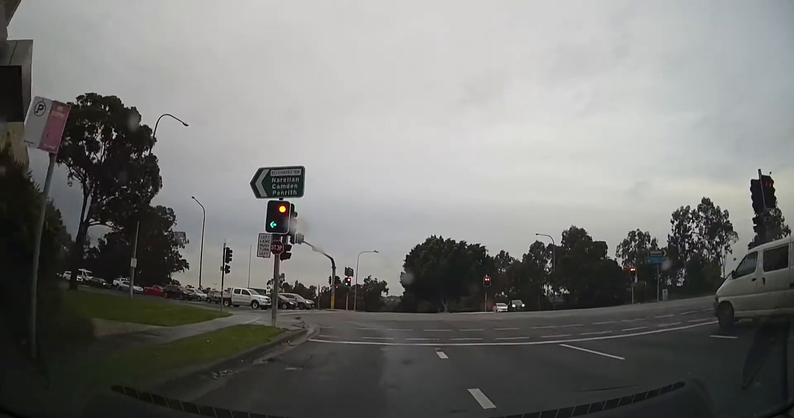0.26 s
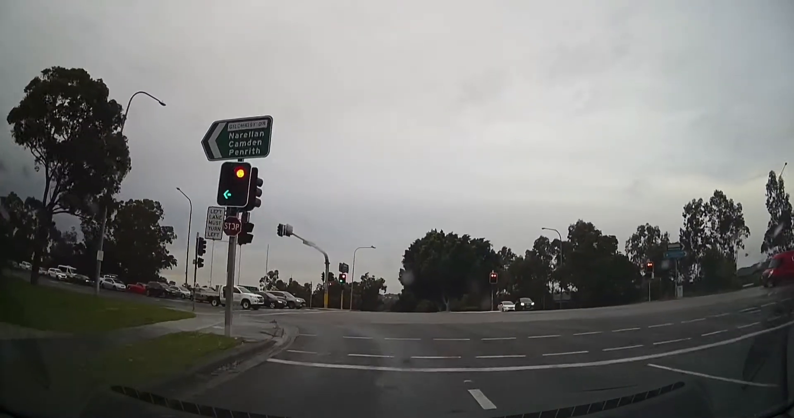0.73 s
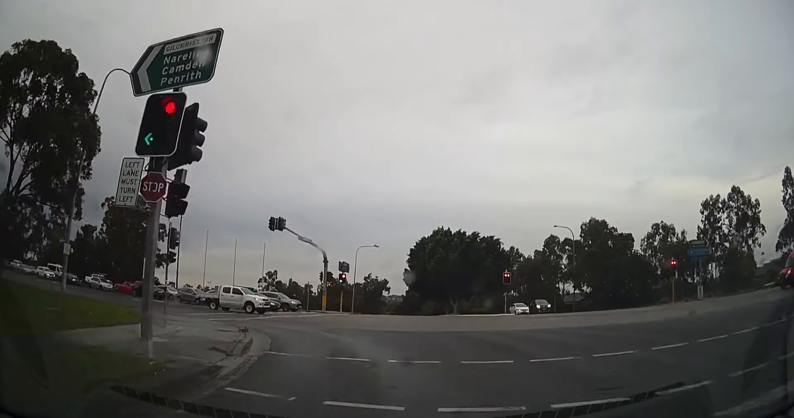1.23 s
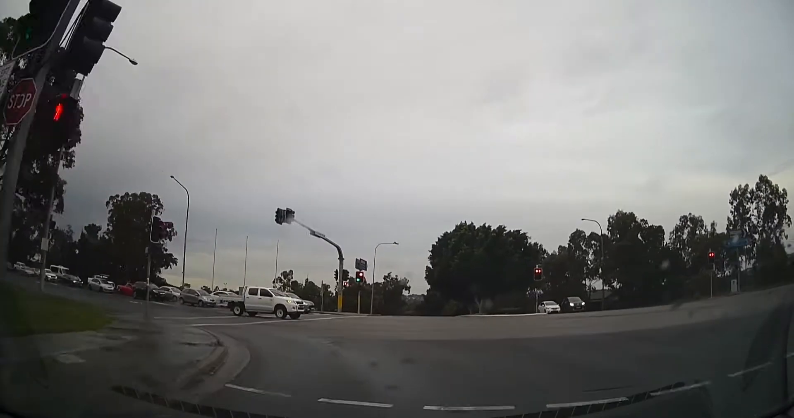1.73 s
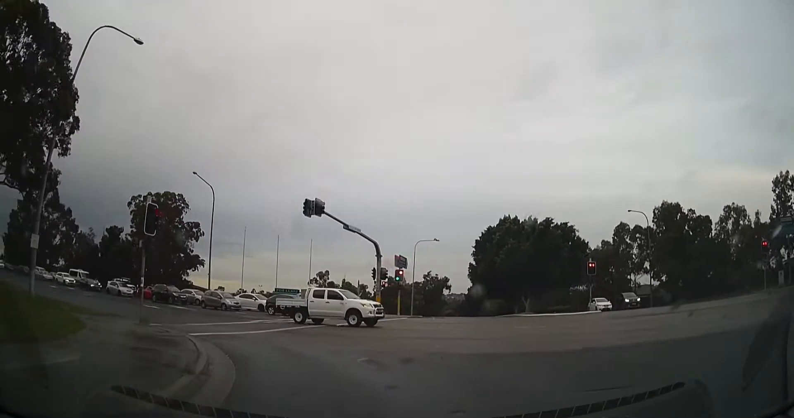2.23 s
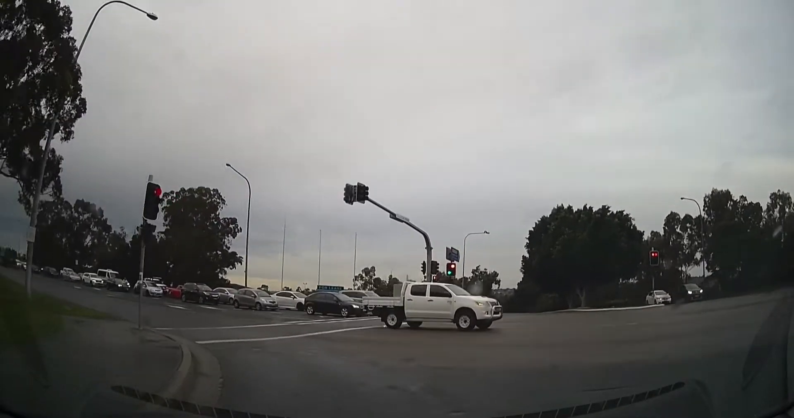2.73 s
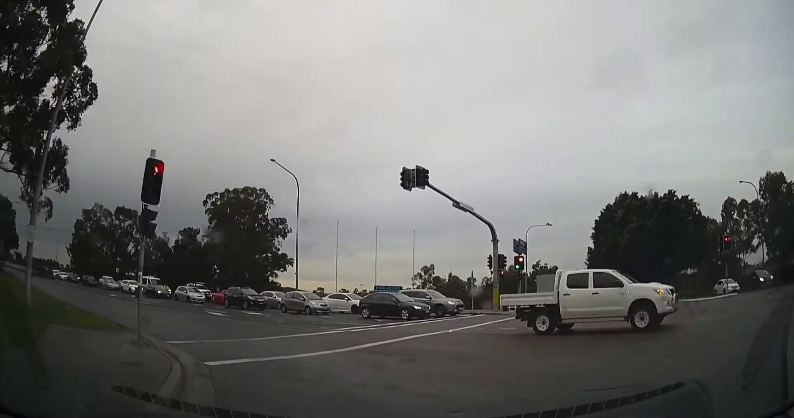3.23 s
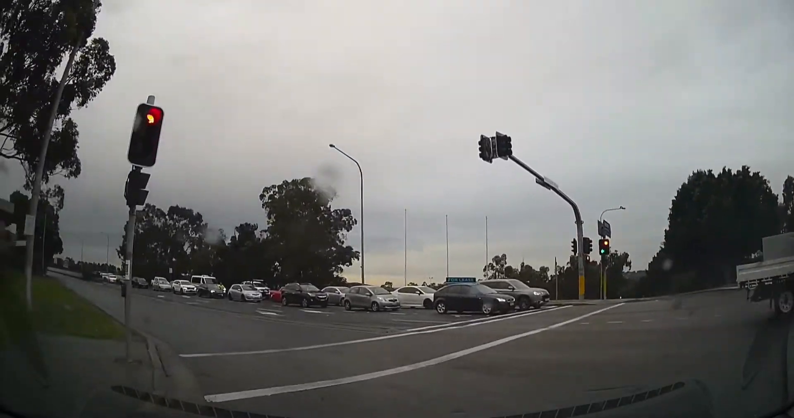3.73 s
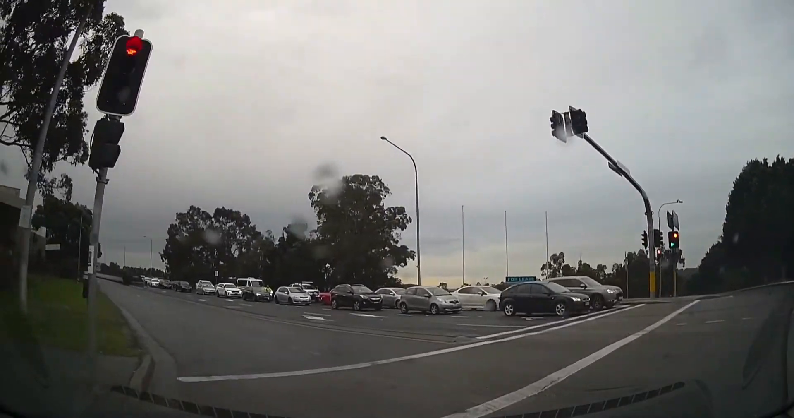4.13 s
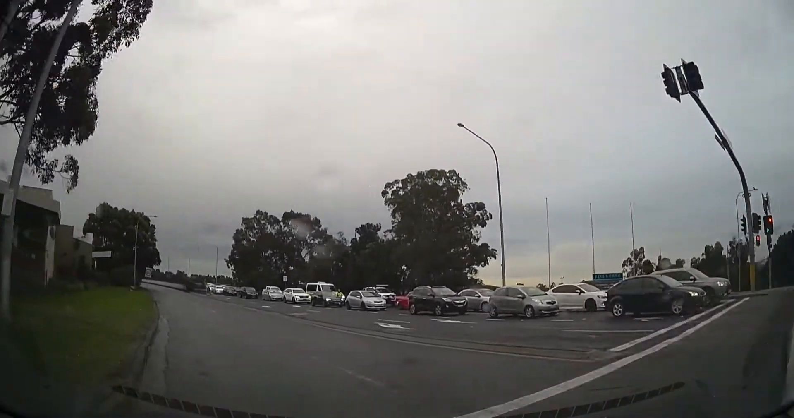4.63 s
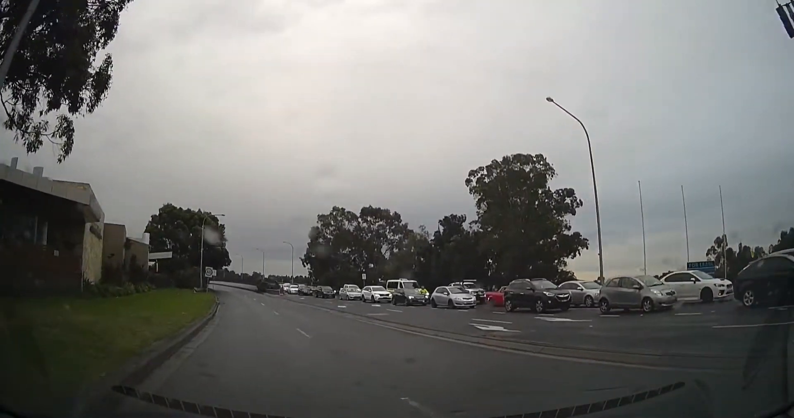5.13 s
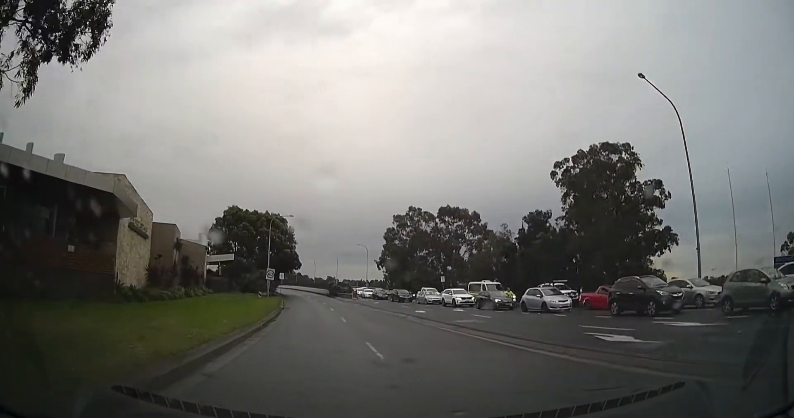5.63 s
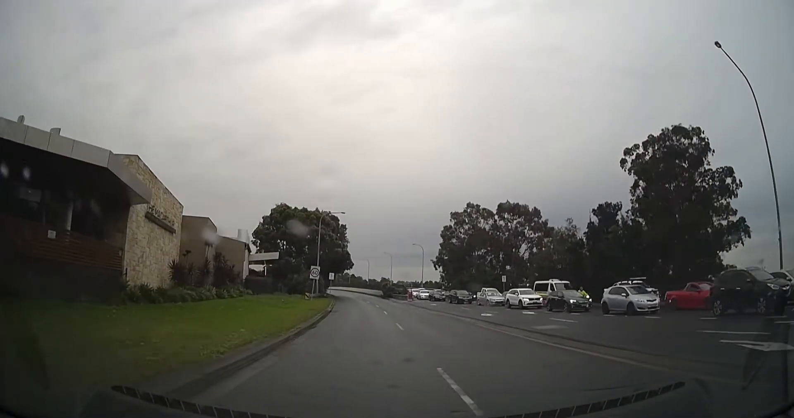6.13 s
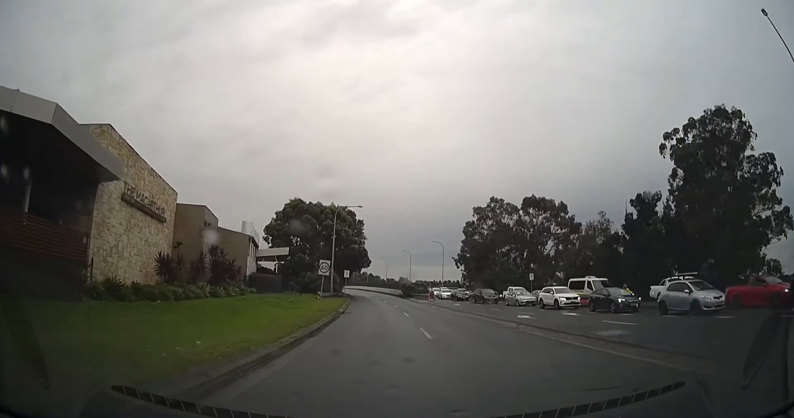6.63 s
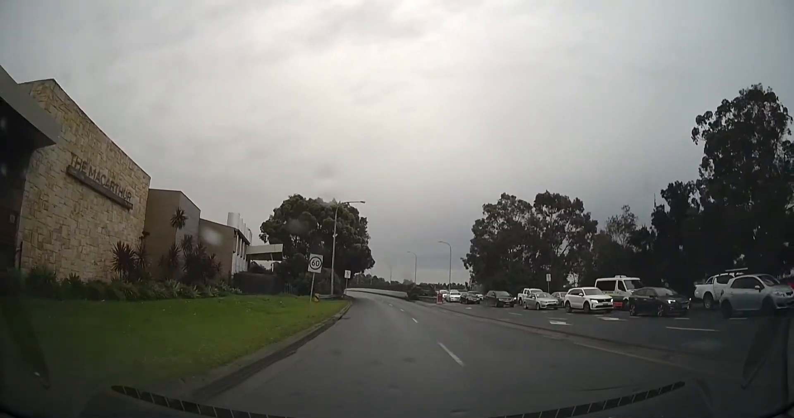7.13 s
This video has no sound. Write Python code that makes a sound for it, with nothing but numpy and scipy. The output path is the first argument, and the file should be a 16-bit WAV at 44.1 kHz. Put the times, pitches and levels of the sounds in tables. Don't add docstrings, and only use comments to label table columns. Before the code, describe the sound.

Heard inside a car from one small windscreen microphone, with dull treble and slight hiss. Low body boom, tyre drumming, muffled wet-road roar and soft engine hum run throughout. From 0.3 s an indicator relay ticks and tocks alternately, roughly every 0.35 s, each click ringing briefly in the cabin. Palms rub hissily on the wheel around 0.6-1.5 s. Loose trim clicks irregularly; a crisp clip snaps at 2.1 s and a padded panel knock follows at 2.5 s. Faint tread whine swells near 3.9 s. From 4.4 to 5.7 s rougher tarmac brings deep thuds and shuddering trim, ending in a tight cluster of snaps at 5.65 s. The stalk ratchets at 5.9-6.1 s, then clacks back loudest at 6.45-6.57 s. Hands rub again around 7 s, and at 7.26 s a small tick cuts to coarser, hissier road noise.

```python
import sys
import numpy as np
from scipy import signal
from scipy.fft import rfft, irfft
from scipy.io import wavfile
from scipy.ndimage import uniform_filter1d

SR = 44100
rng = np.random.default_rng(int(sys.argv[2]) if len(sys.argv) > 2 else 0)


def store_pcm(level_fs):
    pcm = np.round(np.clip(level_fs, -1, 1) * 32767).astype(np.int16)
    wavfile.write(sys.argv[1], SR, np.atleast_2d(pcm).T)


def convert_level_to_amplitude(level_db):
    exponent = np.asarray(level_db, float) / 20
    return 10 ** exponent


N = 325458
COARSE = 64
CHANGE_S = 7.2565


def shaped(gain):
    hz = np.arange(N // 2 + 1) * SR / N + 1e-3
    x = irfft(rfft(rng.standard_normal(N)) * gain(hz), N)
    return x / x.std()


def peaks(hz, modes):
    return np.sqrt(sum((convert_level_to_amplitude(db) / (1 + ((hz - f * f / hz) / w) ** 2)) ** 2 for f, w, db in modes))


def walk(rate_hz):
    k = int(SR / rate_hz)
    held = np.repeat(rng.standard_normal(N // k + 1), k)
    return 1.31 * uniform_filter1d(uniform_filter1d(held, k), k)[:N]


def curves(table):
    s, *columns = np.transpose(table)
    return [np.interp(np.arange(N) / SR, s, c) for c in columns]


def swell(s, rise_s, fall_s, db, edge_db, curve):
    t = np.arange(0, N, COARSE) / SR
    away = np.where(t < s, (s - t) / max(rise_s, .002), (t - s) / max(fall_s, .002))
    return convert_level_to_amplitude(db + np.maximum(edge_db * away ** curve, -99))


def smooth(gains):
    total = np.sqrt(np.sum(np.square(gains), axis=0))
    return np.interp(np.arange(N), np.arange(0, N, COARSE), total)


def steadied(x, span_s, depth):
    span = int(span_s * SR)
    slow = uniform_filter1d(uniform_filter1d(x ** 2, span), span)
    y = x / (slow + 0.054) ** (depth / 2)
    return y / y.std()


def add(out, s, sound):
    i = int(s * SR)
    out[i:i + len(sound)] += sound[:N - i]


def fade(t60_s, rise_s):
    t = np.arange(int(SR / 6)) / SR
    rise = np.sin(np.pi / 2 * np.minimum(t / rise_s, 1)) ** 2
    return t, rise * np.exp(-np.log(1000) * t / max(t60_s, .01))


def ring(modes, rise_s, scatter_db, lag=0., pair=0.59):
    out = 0
    for hz, db, t60_s in modes:
        level, beat, detune = rng.standard_normal(3)
        t, env = fade(t60_s, rise_s + lag / hz)
        turn = 2 * np.pi * hz * (1 + 0.0074 * detune) * t
        tone = np.sin(turn) + pair * np.sin(1.06 * turn + .4 * beat)
        near = signal.iirpeak(hz, 4, fs=SR)
        noise = signal.lfilter(*near, rng.standard_normal(len(t) + 499))
        noise = signal.lfilter(*near, noise)[499:]
        tail = convert_level_to_amplitude(scatter_db) * noise / noise.std() * env ** 0.38 * np.minimum(t / .006, 1)
        out = out + convert_level_to_amplitude(db + .6 * level) * (env * tone + tail)
    return out


def snap(hz, ranges, scatter_db=-11):
    band = signal.butter(2, (800, 2600), "band", fs=SR, output="sos")
    crack = signal.sosfilt(band, rng.standard_normal(int(SR / 6)))
    crack = convert_level_to_amplitude(-8 + ranges[1][0] / 2) * crack / crack.std() * fade(.016, .001)[1]
    main_modes = [(hz, 0, .04), (1.13 * hz, -11, .04)]
    main = ring(main_modes, 0.00089, scatter_db, lag=1.4, pair=.25)
    return crack + main + sum(convert_level_to_amplitude(db) * ring(modes, 0.0011, scatter_db, lag=1.2) for db, modes in ranges)


# f/Hz, width/Hz, boost/dB
CABIN = [(482, 97, 4.5), (759, 57, 7.5), (1024, 91, 4.5), (1270, 280, 3), (1888, 240, 6), (3000, 140, 4.5),
         (5150, 330, 2.5)]


def cabin(hz):
    return np.prod([1 + (convert_level_to_amplitude(db) - 1) / (1 + (2 * (hz - f) / w) ** 2) for f, w, db in CABIN], axis=0)


# t/s, tarmac roughness/dB, speed as roar level/dB
DRIVE = [(0, 1, 4), (.75, -1, 1), (1.6, -3, 0.5), (2.9, -1, -1), (3.7, -4, 1), (4.3, 4.5, -0.5),
         (4.45, 5, 3.5), (4.6, 13.5, 2), (4.8, 2.5, 4), (4.88, 8.5, 6), (4.99, 2, 2.5), (5.3, 7, 2.5),
         (5.45, 6.5, 4), (5.58, 4.5, 3.5), (5.72, 2.5, 2), (6.05, 5.5, 4.5), (6.75, 2, 4), (7.38, 3, 7)]
# f/Hz, density/dB per Hz
ROAR = [(180, -36), (300, 1), (317, -2), (438, -11.5), (476, -11), (613, -14.5), (666, -16.5), (845, -17.5),
        (1200, -17.5), (1320, -21.5), (1680, -34.5), (1830, -31), (3730, -38.5), (6810, -41), (8520, -59),
        (11100, -78), (18700, -120)]


def tyre_roar():
    out = np.zeros(N)
    _, speed_db = curves(DRIVE)
    f, d = np.transpose(ROAR)
    bumps, swells = walk(13), speed_db - speed_db.mean()
    for centre in 340 * 2 ** np.arange(0, 5, .5):
        def band(hz):
            window = np.exp(-(np.log2(hz / centre) / 0.61) ** 2)
            return window * cabin(hz) * convert_level_to_amplitude(np.interp(np.log(hz), np.log(f), d))
        power = np.sum(band(np.arange(100, 9000, 10.)) ** 2)
        share = np.clip((1200 / centre) ** 1.4, 0, 1.25)
        out += np.sqrt(power) * convert_level_to_amplitude(-57 + share * (swells + bumps) + 0.85 * walk(9)) * shaped(band)
    return out


# f/Hz, width/Hz, level/dB
BOOM_MODES = [(32.4, 12, -2), (40.3, 16, 1.5)]
DRUM_MODES = [(74.6, 21, -3), (106.3, 24, 1.5), (125.6, 29.2, -3)]
PANEL_MODES = [(166.6, 61, 1), (207.8, 53.4, -0.5), (269, 46, -10.5)]
# t/s, level/dB, length/s
HEAVES = [(.44, -23.5, 0.38), (.65, -27, 0.19), (.82, -26.5, 0.51), (1.29, -24.5, 0.1), (1.56, -25.5, 0.15),
          (1.9, -26, 0.2), (2.18, -18.5, 0.12), (2.46, -27, 0.31), (2.68, -24.5, 0.11), (2.88, -22.5, 0.13),
          (3.12, -26.5, 0.17), (3.31, -28.5, 0.12), (3.48, -23.5, 0.078), (3.72, -40, 0.087),
          (3.92, -31, 0.14), (4.08, -23, 0.086), (4.45, -20.5, 0.086), (4.56, -17.5, 0.077),
          (4.81, -20.5, 0.12), (4.89, -8, 0.076), (4.96, -16, 0.051), (5.07, -10, 0.11),
          (5.16, -15.5, 0.16), (5.28, -31, 0.11), (5.65, -16, 0.081), (5.87, -24.5, 0.41), (6.4, -31, 0.51),
          (7.36, -31, 0.17)]
# t/s, level/dB, length/s
THUDS = [(0.025, -28, 0.29), (0.33, -22.5, 0.077), (0.46, -24.5, 0.12), (0.652, -24.5, 0.22),
         (1.104, -28.5, 0.22), (1.887, -27, 0.19), (2.616, -30, 0.11), (2.898, -32, 0.34),
         (3.447, -27.5, 0.077), (3.643, -34, .14), (3.804, -29, 0.49), (3.963, -28, 0.21),
         (4.21, -23.5, 0.19), (4.41, -25.5, .08), (4.519, -16, 0.14), (4.649, -14.5, 0.25),
         (4.832, -16, 0.089), (5.006, -13.5, 0.22), (5.245, -14.5, 0.21), (5.518, -18, 0.068),
         (5.629, -15.5, 0.14), (6.611, -25.5, 0.68), (6.97, -19.5, 0.29), (7.37, -20.5, 0.22)]


def bumps_gain(rows):
    return smooth([swell(s, length / 2, length / 2, db, -8, 1.34) for s, db, length in rows])


def body_shake():
    rough_db, _ = curves(DRIVE)
    boom = np.hypot(convert_level_to_amplitude(-36 + 0.37 * rough_db), bumps_gain(HEAVES))
    drum = np.hypot(convert_level_to_amplitude(-32.5 + 0.88 * rough_db), bumps_gain(THUDS))
    panel = convert_level_to_amplitude(-35 + rough_db + 1.2 * walk(9))
    out = np.zeros(N)
    for gain, modes in ((boom, BOOM_MODES), (drum, DRUM_MODES), (panel, PANEL_MODES)):
        out += gain * steadied(shaped(lambda hz: peaks(hz, modes)), 0.067, 0.18)
    return out


def coarser_road():
    later = np.arange(N) / SR > CHANGE_S
    modes = [(1300, 600, 2), (2700, 1900, -8)]
    return convert_level_to_amplitude(-47) * later * shaped(lambda hz: cabin(hz) * peaks(hz, modes))


# t/s, f/Hz, level/dB
ENGINE = [(0, 40.24, -34), (1.5, 37.5, -42), (2.0, 43.57, -37.5), (2.8, 37.86, -33), (3.6, 42.25, -44.5),
          (4.5, 40.3, -33.5), (5.7, 48.77, -33), (6.6, 51.7, -45.5), (7.38, 35.8, -29)]


def engine():
    hz, db = curves(ENGINE)
    phase = 2 * np.pi * np.cumsum(hz * (1 + .015 * walk(4.5))) / SR
    return convert_level_to_amplitude(db + 1.4 * walk(7.9)) * (np.sin(phase) + convert_level_to_amplitude(-14.5) * np.sin(2 * phase))


# t/s, rise/s, fall/s,
# level/dB, f/Hz
WHINES = [(1.95, .6, .6, -72, 2930), (2.1, 0.7, .8, -72.5, 2750), (3.93, .2, .32, -66.5, 2910),
          (3.85, 0.18, .35, -69, 2740), (3.75, .1, .2, -66, 1880), (6.2, 0.28, .3, -73.5, 2900),
          (7, 0.56, 0.41, -66, 1930), (7.001, 0.26, 0.35, -69.5, 2800)]


def tread_whine():
    out = np.zeros(N)
    for *row, f in WHINES:
        gain = smooth([swell(*row, -7.5, 3.4)]) * convert_level_to_amplitude(2.4 * walk(18))
        out += gain * shaped(lambda hz: peaks(hz, [(f, 0.13 * f, 0)]))
    return out


# t/s, rise/s, fall/s, level/dB
RUBS = [
    (.66, 0.091, .12, -66),
    (.85, 0.18, .17, -60.5),
    (1.3, .35, 0.19, -64.5),
    (6.7, 0.13, 0.22, -65.5),
    (7.05, 0.22, 0.2, -62),
]
# f/Hz, width/Hz, level/dB
PALM = [(4050, 700, -6), (4470, 590, -1.5), (4930, 500, 0.5), (5320, 600, 3.5), (6260, 950, -6),
        (7050, 520, -7.5)]


def palms():
    rub = smooth([swell(*row, -11, 2.3) for row in RUBS]) * convert_level_to_amplitude(1.4 * walk(25))
    core = rub * shaped(lambda hz: peaks(hz, PALM[1:4]))
    wider = convert_level_to_amplitude(-1) * rub * (rub / rub.max()) ** 0.52
    return core + wider * shaped(lambda hz: peaks(hz, PALM[:1] + PALM[4:]))


# t/s, rise/s, fall/s, level/dB, f/Hz
SCRAPES = [
    (4.51, 0.12, 0.2, -44, 500),
    (5.4, 0.028, 0.068, -52, 1400),
    (6.046, .01, .08, -56, 1200),
    (5.97, 0.065, 0.052, -65, 5200),
    (6.461, 0.013, 0.035, -47, 1400),
    (6.495, 0.007, 0.05, -46, 1200),
    (6.466, 0.032, 0.091, -55, 4660),
    (6.54, 0.095, 0.048, -39.5, 500),
]


def scrapes():
    out = np.zeros(N)
    grain = convert_level_to_amplitude(4.9 * walk(180))
    for *row, f in SCRAPES:
        noise = shaped(lambda hz: cabin(hz) * peaks(hz, [(f, 0.25 * f, 0)]))
        out += smooth([swell(*row, -12, 1.7)]) * grain * noise
    return out


# f/Hz, level/dB, t60/s
KNOCK = [(506, -19, 0.07), (600, -24, 0.04), (720, -37, 0.025), (335, -36, .05), (2960, -58, 0.04),
         (1900, -51, 0.03)]


def panel_knock():
    out, at_s = np.zeros(N), 2.490
    add(out, at_s, ring(KNOCK[1:], 0.005, -14, pair=.1))
    add(out, at_s + 0.0067, ring(KNOCK, 0.004, -16, pair=.1))
    return out


# f/Hz, level/dB, t60/s
CLIP_EDGE = [(2040, 2.5, .03), (3740, 3, 0.022), (3450, 2, 0.022), (4200, -13, 0.015), (5500, -3, 0.037),
             (5930, -9, 0.032), (7060, -23, 0.026), (7370, -25, .05), (2940, -6, 0.05), (1580, -13, 0.031)]
CLIP_BODY = [(980, -8, 0.051), (1337, -6.5, 0.076), (1850, -5.5, 0.054), (2240, -10.5, 0.06),
             (4960, -17, .035), (590, -12, .06), (780, -13, .07), (1650, -14, 0.063)]


def clip_release():
    out, at_s, gain = np.zeros(N), 2.1286, convert_level_to_amplitude(-27)
    add(out, at_s, gain * ring(CLIP_EDGE, 0.002, -9.5, lag=1.6))
    add(out, at_s + 0.00078, gain * ring(CLIP_BODY, 0.0016, -12, lag=1.2))
    return out


# f/Hz, level/dB, t60/s
TRIM_LOW = [(444, -1.5, 0.056), (547, -5.5, 0.13), (785, -2.5, 0.059)]
TRIM_MID = [(1740, -1, 0.016), (1860, -0.5, 0.026), (2034, -3.5, 0.06), (2100, -9, 0.045)]
TRIM_HIGH = [(2350, -2.5, 0.023), (2480, -4.5, 0.024), (2934, 3.5, 0.036), (3300, -6.5, 0.015)]
TRIM_TOP = [(3450, 0, 0.031), (4260, -2.5, 0.03), (4830, -5, 0.024), (5270, -2.5, 0.03), (6040, -6, 0.018),
            (6870, -16.5, 0.033)]
# t/s, peak level/dB, main ring f/Hz, crispness/dB, sheen/dB
CLICKS = [(.127, -44.5, 1208, -12.5, -32), (0.2437, -56, 1270, 8, -5), (.575, -57, 1200, -1, 3),
          (1.098, -45, 810, -16, -35), (1.4428, -34, 1020, -6.5, -20), (1.4678, -36.5, 1300, -8, -20),
          (1.6577, -36, 1105, -16.5, -34), (1.946, -34.5, 1270, -8.5, -34), (2.301, -43, 1000, -11, -28),
          (2.915, -55, 1020, -1, -6), (3.1428, -35.5, 1214, -19, -40), (3.7189, -36, 954, -10, -27),
          (4.3929, -42, 954, -21, -42), (4.4583, -52, 1000, -13.5, -30.5), (4.7277, -49.5, 1270, -17, -32),
          (4.9945, -43, 1134, -1, -11.5), (5.0068, -31.5, 1220, -6.5, -18.5), (5.45, -46, 1270, -2.5, -13),
          (5.6412, -29.5, 1180, 0.5, -10), (5.649, -37, 1040, -23.5, -36),
          (5.6565, -23.5, 1310, -23.5, -40), (5.666, -34, 1310, -13, -34), (5.672, -38, 1340, -18, -36),
          (5.6863, -40, 1340, -14, -28)]


def trim_clicks():
    out = np.zeros(N)
    for s, db, hz, crisp, sheen in CLICKS:
        ranges = [(-12, TRIM_LOW), (crisp - 3.5, TRIM_MID), (crisp - 7, TRIM_HIGH), (sheen, TRIM_TOP)]
        add(out, s - .001, convert_level_to_amplitude(db) * snap(hz, ranges))
    return out


# f/Hz, level/dB, t60/s
CAM_MID = [(2065, -1, .06), (2030, -11, 0.053), (1800, -11, .03)]
CAM_HIGH = [(2660, -1, .03), (2940, -2, 0.034)]
CAM_TOP = [(3900, -0.5, 0.037), (3700, -7, .04), (4500, -8, .03), (5270, -4, 0.05), (6300, -18, .03)]
# t/s, peak level/dB, main ring f/Hz, crispness/dB, sheen/dB
RATCHET = [(5.909, -33.5, 1180, -13, -24), (5.9435, -28.5, 1484, -12, -31), (5.955, -30.5, 1300, -8, -27),
           (5.968, -43, 1270, -6.5, -25), (5.979, -42, 1240, -6.5, -28), (5.992, -46, 1290, -1, -19),
           (6.003, -39, 1290, -7, -27), (6.0404, -30, 1160, -18, -25.5), (6.0445, -26, 1050, -6.5, -16),
           (6.052, -30.5, 1354, -10, -15), (6.057, -28, 1060, -7, -26), (6.066, -42, 1300, -8, -22),
           (6.0855, -28, 1233, -14, -31), (6.093, -34, 1250, -21, -36), (6.101, -31, 1040, -20, -36),
           (6.112, -32, 1160, -17, -36)]


def cam_ratchet():
    out = np.zeros(N)
    for s, db, hz, crisp, sheen in RATCHET:
        ranges = [(-16, TRIM_LOW), (crisp - 1.5, CAM_MID), (crisp - 9, CAM_HIGH), (sheen, CAM_TOP)]
        add(out, s - .001, convert_level_to_amplitude(db) * snap(hz, ranges, scatter_db=-10.5))
    return out


# f/Hz, level/dB, t60/s
STALK_LOW = [(532, 0.5, 0.056), (435, 0.5, 0.047), (750, -2.5, .04)]
STALK_MID = [(1670, 3.5, 0.03), (1880, 1.5, 0.046), (2030, -4.5, 0.033)]
STALK_TOP = [(3200, 0, 0.046), (3480, -0.5, .03), (3900, -4, .035), (4500, -10, .03), (5440, -10, 0.043),
             (6900, -11.5, .03)]
# t/s, peak level/dB, main ring f/Hz, crispness/dB, hollow body/dB
STALK = [(6.4345, -42, 1000, -1, -8), (6.4565, -22, 950, -5, -9), (6.462, -29, 1400, -3, -4),
         (6.466, -33, 950, -8, 3), (6.476, -37, 1300, -2, -4), (6.4885, -24, 1400, 0, -3),
         (6.4905, -14, 1000, -18, -22), (6.4985, -25, 1250, -9, -13), (6.5085, -22, 1000, -12, -9),
         (6.516, -29, 1000, -7, -12), (6.5279, -24, 970, -7, -4), (6.533, -26, 900, -14, -3),
         (6.541, -27, 950, -16, -1), (6.55, -38, 900, -12, 8), (6.559, -31, 900, -12, 1),
         (6.569, -34, 950, -16, -5)]


def stalk_return():
    out = np.zeros(N)
    for s, db, hz, crisp, hollow in STALK:
        ranges = [(hollow, STALK_LOW), (crisp - 1.5, STALK_MID),
                  (crisp - 14, TRIM_HIGH), (1.35 * crisp - 11, STALK_TOP)]
        add(out, s - .001, convert_level_to_amplitude(db) * snap(hz, ranges))
    return out


# f/Hz, level/dB, t60/s
TICK = [(4260, -54, 0.025), (3110, -61, 0.03), (4900, -64, .02), (1900, -59, 0.03), (1600, -53, .035),
        (1400, -44, 0.045), (1210, -35, 0.04), (980, -41, 0.045), (740, -48, 0.04), (520, -36, 0.035),
        (342, -38, 0.05)]
TOCK = [(5240, -59, 0.03), (4800, -55, 0.03), (2920, -61, 0.04), (1950, -52, 0.035), (1600, -53, .04),
        (1400, -45, 0.04), (1220, -38, 0.04), (1000, -44, .045), (740, -49, 0.04), (517, -35.5, .035),
        (350, -38, .05)]


def relay():
    out = np.zeros(N)
    start_s, period_s, on_s = .3043, .69986, .339
    for offset_s, modes in ((0, TICK), (on_s, TOCK)):
        armature = ring([m for m in modes if m[0] > 1300], 0.0014, -10, lag=1.5)
        dash = ring([m for m in modes if 850 < m[0] <= 1300], 0.0025, -12, pair=.2)
        housing = ring([m for m in modes if m[0] <= 850], 0.003, -13, pair=.2)
        for k in range(9):
            at_s = start_s + k * period_s + offset_s - .002
            gain = convert_level_to_amplitude(0.8 * rng.standard_normal())
            add(out, at_s, gain * (armature + housing + convert_level_to_amplitude(-8) * dash))
            add(out, at_s + .0055, gain * dash)
            add(out, at_s + .009, gain * housing)
    return out


def scene():
    background = tyre_roar() + body_shake() + coarser_road() + engine() + tread_whine()
    handling = palms() + scrapes() + panel_knock() + clip_release()
    plastic = trim_clicks() + cam_ratchet() + stalk_return()
    return (background + handling + plastic + relay())[None]


def low_pass(x):
    return signal.sosfilt(signal.butter(12, 16000, fs=SR, output="sos"), x)


def record(dry):
    steep = signal.cheby1(10, .5, 7500, fs=SR, output="sos")
    x = signal.sosfilt(steep, np.pad(dry, ((0, 0), (4096, 0)), mode="wrap"))
    mirror = x * np.cos(2 * np.pi * 16000 / SR * np.arange(x.shape[1]))
    mirror_band = signal.butter(6, (8000, 8900), "band", fs=SR, output="sos")
    x = x + convert_level_to_amplitude(-22.5) * signal.sosfilt(mirror_band, mirror)
    x = signal.sosfilt(signal.butter(2, 27, "high", fs=SR, output="sos"), x)[:, -N:]
    x = x + convert_level_to_amplitude(-83.5) * shaped(lambda hz: peaks(hz, [(7460, 1500, 0)]) / (1 + (hz / 8300) ** 24))
    since_s = np.arange(N) / SR - CHANGE_S
    x = x * np.where(since_s > 0, np.clip(since_s / .04, .25, 1), np.clip(-since_s / 0.002, 0, 1))
    x = x - convert_level_to_amplitude(-41.5) * np.sign(since_s) * np.exp(-np.abs(since_s) / .004)
    from_end = np.minimum(np.arange(N), np.arange(N)[::-1])
    x = x * convert_level_to_amplitude(-6 * np.exp(-from_end / (.03 * SR)))
    return low_pass(x)


dry = scene()
out = record(dry)
store_pcm(out)
```